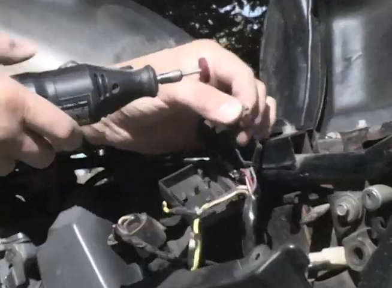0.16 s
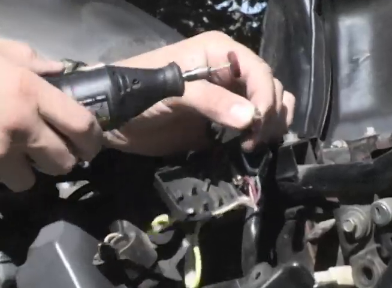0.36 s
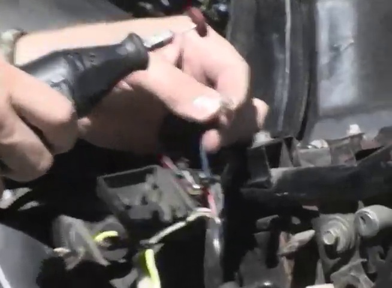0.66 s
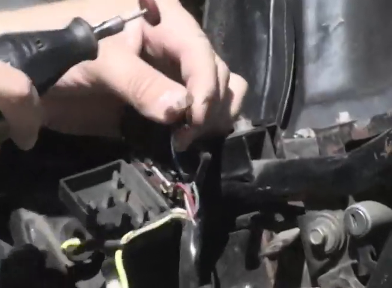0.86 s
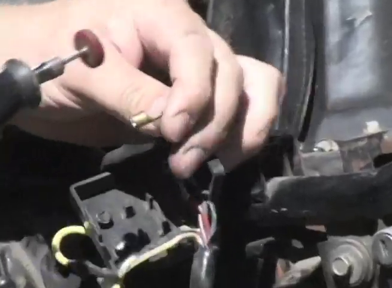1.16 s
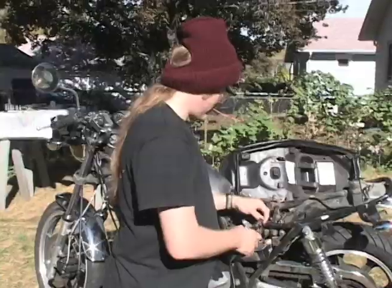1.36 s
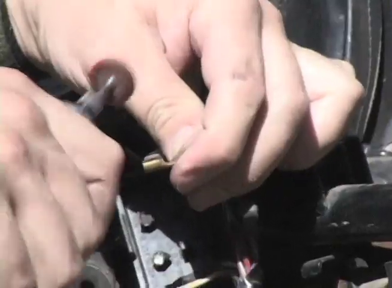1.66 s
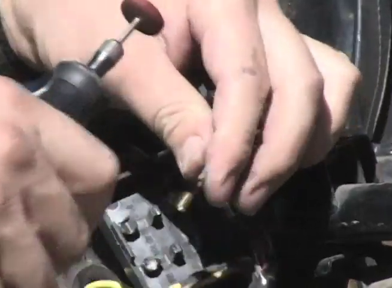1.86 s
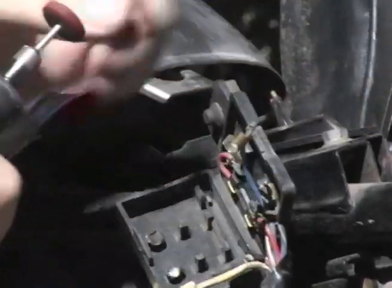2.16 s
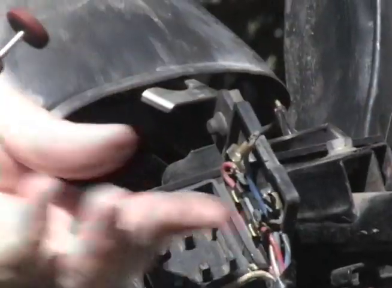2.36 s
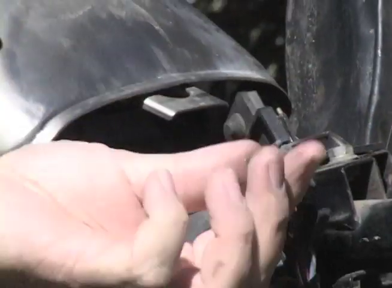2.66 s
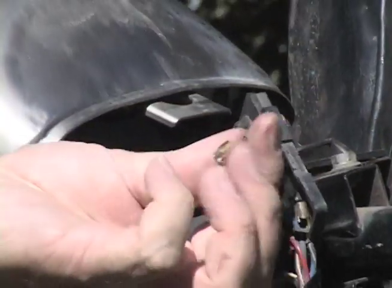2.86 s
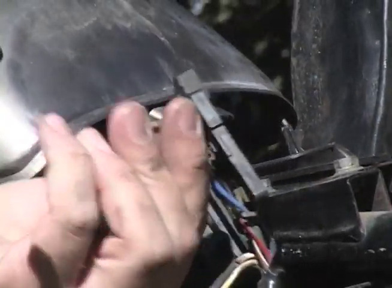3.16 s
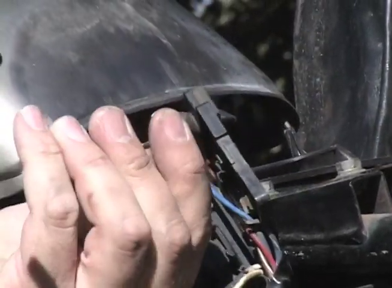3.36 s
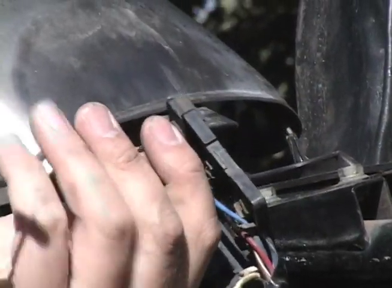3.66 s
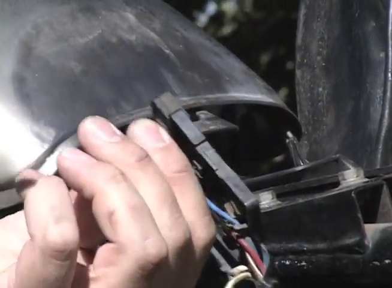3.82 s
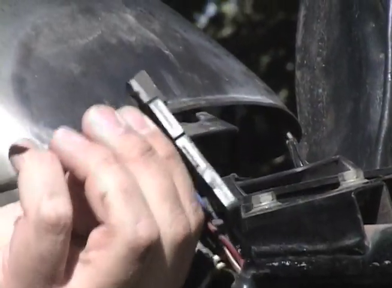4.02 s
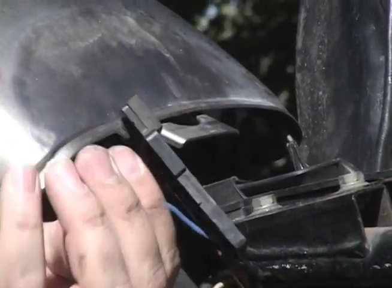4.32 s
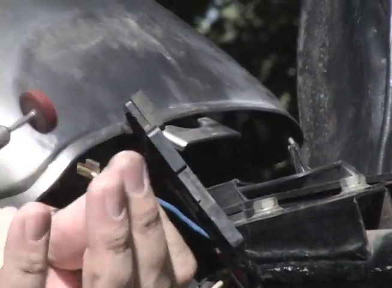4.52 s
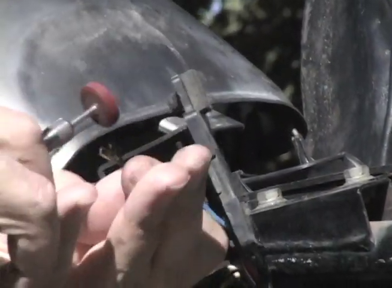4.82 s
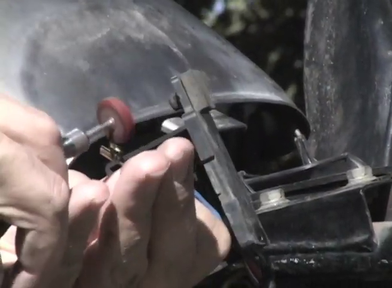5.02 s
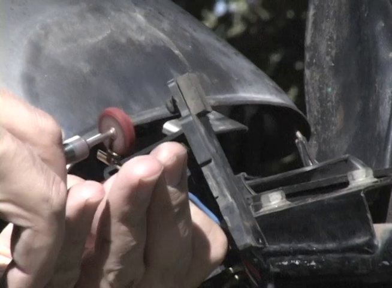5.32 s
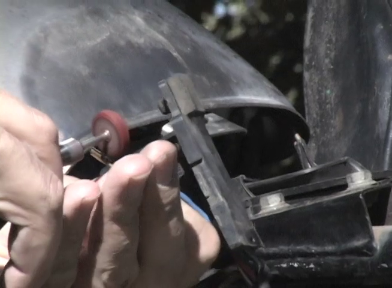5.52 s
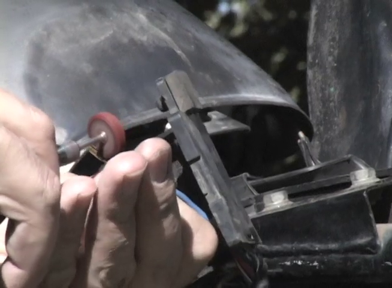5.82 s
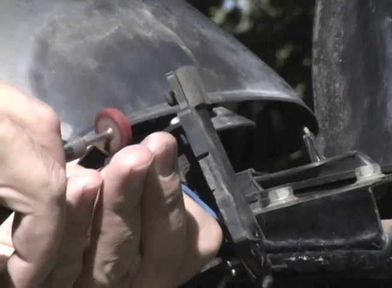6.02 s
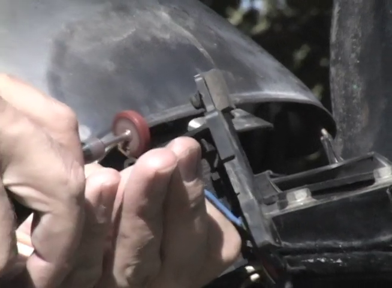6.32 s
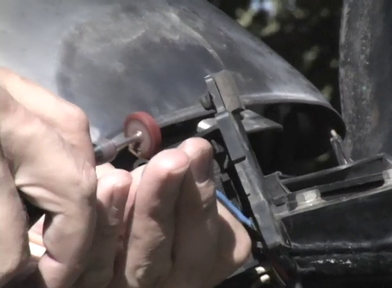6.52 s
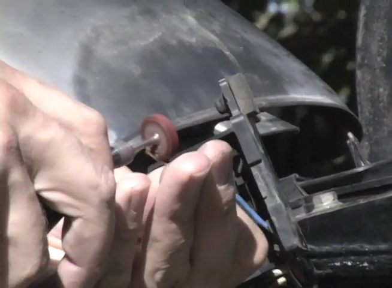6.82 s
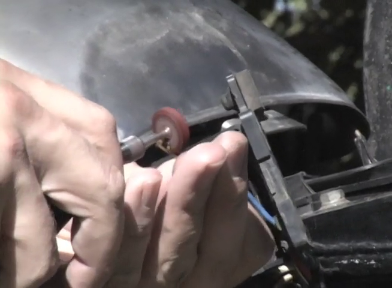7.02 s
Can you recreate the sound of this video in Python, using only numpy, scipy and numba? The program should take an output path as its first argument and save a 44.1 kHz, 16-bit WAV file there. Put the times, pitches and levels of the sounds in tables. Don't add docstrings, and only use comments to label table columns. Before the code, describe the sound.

From 0 to 0.5 s, a quiet yard: soft town hum, fading traffic rumble, a faint chirp, and distant hoarse crow caws near 0.1 and 0.55 s, with tiny plastic ticks. At 0.5 s a sharp slider switch snaps with a quick rattle. A handheld rotary tool starts at once, its growl raspy and buzzing, racing upward; another far caw at 1.05 s is partly masked. By 1.5 s it is a rising whine, climbing ever more slowly until about 4 s, with a light tick at 2.85 s. Piercing mid-high tones, a rough mains-like buzz and airy vent hiss swell, hollow and flicker as the hand turns it. From 4 to 6.3 s it holds fairly steady. Around 6.4 s felt begins scratching brass, strongest near 6.75 s; pitch sags through 7.1 s, still running. Close single microphone, open air.

```python
import sys
import numpy as np
from scipy import signal
from scipy.fft import rfft, irfft
from scipy.io import wavfile
from scipy.ndimage import uniform_filter1d
from numba import njit

SR = 44100
rng = np.random.default_rng(int(sys.argv[2]) if len(sys.argv) > 2 else 0)


def log_audio(samples):
    frames = np.atleast_2d(samples).T
    limited = np.clip(frames, -1, 1)
    pcm = np.round(limited * 32767).astype(np.int16)
    wavfile.write(sys.argv[1], SR, pcm)


def rack_gain(trim_db):
    fader = np.asarray(trim_db, float)
    return 10 ** (fader / 20)


N = 316638
T = np.arange(N) / SR
MAINS_PULSE_HZ = 120
FREE_HZ = 278

# centre_hz, width_hz
CASING = (2350, 260)
CASING_HZ, CASING_WIDTH_HZ = CASING


def curves(table):
    time_s, *columns = np.transpose(table)
    return [np.interp(T, time_s, column) for column in columns]


def steady(x, level_db):
    return x * rack_gain(level_db) / np.sqrt(uniform_filter1d(x ** 2, size=8000) + 1e-20)


def band(x, lo_hz, hi_hz):
    return signal.sosfilt(signal.butter(4, [lo_hz, hi_hz], "band", fs=SR, output="sos"), x)


def coloured(points):
    hz, db = np.transpose(points)
    bins_hz = np.maximum(np.arange(N // 2 + 1) * SR / N, 1)
    gain = rack_gain(np.interp(np.log(bins_hz), np.log(hz), db))
    x = irfft(rfft(rng.standard_normal(N)) * gain, N)
    return x / x.std()


def walk(rate_hz):
    hold = int(SR / rate_hz)
    steps = np.repeat(rng.standard_normal(N // hold + 1), hold)
    return 1.3 * uniform_filter1d(uniform_filter1d(steps, hold), hold)[:N]


@njit
def ring(x, hz, width_hz):
    y, b, l = np.empty(len(x)), 0., 0.
    for i in range(len(x)):
        g, k = np.tan(np.pi * hz[i] / SR), width_hz / hz[i]
        v = (b + g * (x[i] - l)) / (1 + g * (g + k))
        b, l, y[i] = 2 * v - b, l + 2 * g * v, k * v
    return y


def posed(pose_db):
    turning_s = (1.5, 2.8, 3.3, 5.0, 5.35, 6.5, 7.0)
    pose_at = (0, 1, 2, 2, 3, 3, 4)
    return np.interp(T, turning_s, np.take(pose_db, pose_at))


def heard_db(line_hz, turn, ring_hz, spacing_hz):
    level_db, centre_hz, null_hz = curves(turn)
    comb = 1 - .97 * np.cos(np.pi * (line_hz - null_hz) / spacing_hz) ** 2
    return level_db - 20 * np.log10(1 + ((line_hz - centre_hz) / ring_hz) ** 2) + 10 * np.log10(comb)


def shimmer(shaft_hz):
    db_per_hz_s, most_db = .06, 5
    glide_hz_s = np.abs(uniform_filter1d(np.gradient(shaft_hz) * SR, size=9000))
    return np.minimum(db_per_hz_s * glide_hz_s, most_db) * walk(12)


def yard():
    # freq_hz, level_db per Hz
    hum_spectrum = [(25, -26), (48, -25), (85, -9), (130, -9), (270, -4), (500, -5), (750, -6.5),
                    (1000, -7), (1500, -10.5), (2200, -19.5), (3500, -16), (5600, -24), (11000, -28.5),
                    (16000, -29)]
    rumble = steady(band(rng.standard_normal(N), 149, 500), -55.5 + 1.5 * walk(14.2))
    rumble *= np.clip((1.0 - T) / .5, 0, 1)
    return coloured(hum_spectrum) * rack_gain(-51 + 0.3 * walk(2.896)) + rumble


def birds():
    # start_s, length_s, throat_hz, level_db
    caws = [
        (0.124, 0.28, 1363, -50),
        (0.546, 0.24, 1490, -51),
        (1.045, 0.16, 1432, -48.5),
    ]
    # start_s, length_s, throat_hz, level_db
    chirp = (.01, .09, 3600, -59)
    pulse_hz = 60 * (1 + 0.137 * walk(31.0))
    pulses = np.exp(0.81 * np.cos(2 * np.pi * np.cumsum(pulse_hz) / SR))
    out = 0
    for start_s, length_s, hz, level_db in caws + [chirp]:
        u = np.clip((T - start_s) / length_s, 0, 4)
        shape = np.clip(u / .12, 0, 1) * np.where(u < .5, 1, np.exp(-(u - .5) / .3))
        throat_hz = hz * (1 - 0.066 * np.minimum(u, 1.2) ** 2)
        tone = np.sin(2 * np.pi * np.cumsum(throat_hz) / SR)
        breath = (1.5 + 6 * np.minimum(u, 1)) * rng.standard_normal(N)
        voice = pulses * (tone + breath)
        out = out + shape * steady(ring(voice, throat_hz, 0.16 * hz), level_db)
    return out


def ticks():
    # start_s, peak_db, bright (0 dull to 1), t60_s
    contacts = [(.185, -46, 0.93, .02), (.375, -39, 0, .03), (.395, -46, 0.76, .012),
                (.438, -48, 0.95, .01), (.4947, -26.5, 0.7, .009), (0.4981, -29, 0.42, 0.027),
                (.5012, -32, 0.47, 0.017), (.503, -38, 0.28, 0.029), (.5757, -42, 0.99, .008),
                (.27, -51, 0, .03), (2.845, -34, 0, .04), (7.003, -40, 0.082, .05)]
    # freq_hz, width_hz, level_db
    modes = [(1700, 860, -7), (3000, 300, -5.5), (4020, 600, -3), (6080, 630, -2.5), (9750, 1200, -6),
             (13000, 3000, -14)]
    out, t = np.zeros(N + 2000), T[:2000]
    for start_s, peak_db, bright, t60_s in contacts:
        decay = np.exp(-np.log(1000) * t / max(t60_s, .003))
        scrape = rng.standard_normal(len(t)) * decay * (1 - np.exp(-t / 0.00015))
        favoured_hz = 1800 * 4.9 ** bright
        sound = 0
        for hz, width_hz, mode_db in modes:
            tilt_db = -14 * np.log2(hz / favoured_hz) ** 2 / 2
            once = ring(scrape, hz + 0 * t, 1.6 * width_hz)
            sound = sound + rack_gain(mode_db + tilt_db) * ring(once, hz + 0 * t, 1.6 * width_hz)
        out[int(start_s * SR):][:2000] += rack_gain(peak_db) * sound / np.abs(sound).max()
    return out[:N]


def buffing(angle):
    # time_s, extra_db
    presses = [
        (6.43, 2),
        (6.59, 5),
        (6.745, 7.5),
        (6.83, 6.5),
        (6.96, -1),
        (7.1, -1),
    ]
    flare_s = 0.028
    comb = 0
    for k in range(9, 60):
        level_db = 5 * walk(24) - .4 * abs(k - 37)
        comb = comb + rack_gain(level_db) * np.cos(k * angle + rng.uniform(0, 2 * np.pi))
    turn_part = angle / (2 * np.pi) % 1
    grit = band(rng.standard_normal(N) * np.exp(-turn_part / .2), 9300, 11200)
    scuff = comb / comb.std() + .5 * grit / grit.std()
    press_db = sum(db * np.exp(-((T - time_s) / flare_s) ** 2) for time_s, db in presses)
    return steady(scuff, -52 + press_db) * np.clip((T - 6.33) / .08, 0, 1)


def cooling_air(angle, shaft_hz):
    # freq_hz, level_db per Hz
    vent_spectrum = [(300, -7.5), (750, -3), (950, -1), (1350, -1), (1650, -2.5), (2300, -2), (3100, -7),
                     (4400, -1), (5500, -9), (6300, -4.5), (7200, -10), (8700, -23), (10500, -15),
                     (16000, -26)]
    # freq_hz, width_hz, level_db in each of five poses
    whistles = [(910, 57, -15, -21, 6.5, -19, -18), (1008, 38, 1, 9.5, 3.6, 8, 4),
                (1260, 190, 5.5, 6.5, 1.3, 1.5, 0)]
    edges_hz = (350, 1750, 8000, 9400, 16000)
    range_pose_db = [
        (-46, -44.5, -43.5, -47, -47),
        (-45.5, -44.5, -45.5, -44.5, -42.5),
        (-54.5, -57.5, -50.5, -57, -64),
        (-54, -55, -49.5, -52.5, -45.5),
    ]
    # start_s, fading_s, hiss_lift_db
    vent_glimpse = (2.22, 0.74, 6.3)
    db_per_decade = 24.5
    rush = coloured(vent_spectrum) * (1 + 0.059 * np.cos(angle))
    for hz, width_hz, *pose_db in whistles:
        rush += rack_gain(posed(pose_db)) * ring(rush, hz + 0 * T, 1. * width_hz)
    rush -= 0.44 * ring(rush, 1650 + 0 * T, 100.0)
    speed_db = db_per_decade * np.log10(shaft_hz / FREE_HZ)
    levels_db = [posed(pose_db) + speed_db for pose_db in range_pose_db]
    start_s, fading_s, lift_db = vent_glimpse
    fade = np.exp(-(np.maximum(T - start_s, 0) / fading_s) ** 2)
    levels_db[2] += lift_db * np.clip((T - start_s) / .1, 0, 1) * fade
    trims_db = (-2.1, 2, -4.5, -4.0)
    out = 0
    for lo_hz, hi_hz, level_db, trim_db in zip(edges_hz, edges_hz[1:], levels_db, trims_db):
        out = out + steady(band(rush, lo_hz, hi_hz), level_db + trim_db + 0.89 * walk(9))
    return out


def singing(angle, shaft_hz):
    # multiple, level_db
    strong_lines = [(15, 2.8), (16, 2.5), (17, -6), (18, 4.5)]
    # multiple, open_db, aside_db, part_db
    weak_lines = [(1, -63, -60.5, -63), (2, -70, -66, -67), (3, -72, -59, -65), (4, -70, -62, -68),
                  (6, -62, -58, -59), (10, -64, -60, -58), (12, -68, -60, -57), (14, -59, -55, -55),
                  (19, -62, -64, -60), (21, -62, -61, -60), (23, -57, -61, -59), (24, -55, -59, -60),
                  (25, -66, -65, -68), (27, -73, -69, -68), (29, -74, -72, -70), (31, -75, -71, -75),
                  (32, -75, -70, -75), (34, -74, -68, -65), (36, -73, -59, -65), (38, -78, -69, -67),
                  (39, -75, -68, -68), (40, -75, -69, -65), (42, -72, -75, -70), (44, -77, -73, -73),
                  (45, -79, -76, -74), (46, -80, -78, -74), (48, -82, -78, -76)]
    # time_s, level_db, centre_hz, null_hz of the hand's reflection
    cavity_turn = [(1.0, -55, 2900, 2500), (1.37, -43.5, 3500, 3000), (1.6, -52, 4330, 3800),
                   (1.91, -45.7, 4293, 3645), (2.18, -36.7, 4307, 3765), (2.48, -32.1, 4564, 4529),
                   (2.81, -35.5, 4442, 4213), (3.13, -33.7, 4621, 4754), (3.89, -33.8, 4678, 4613),
                   (4.04, -38.1, 4540, 4550), (4.28, -36, 4962, 4879), (4.65, -33.3, 4499, 4598),
                   (5.27, -33.6, 4626, 4647), (5.37, -40, 4551, 4664), (5.74, -33.4, 4732, 5034),
                   (6.58, -32.4, 4754, 4970), (7.12, -33.5, 4539, 4762), (7.18, -38.7, 4187, 4176)]
    cavity_ring_hz, null_spacing_hz = 214, 1300
    ripple_depth = .08 + 2.2 * np.clip(1 - shaft_hz / FREE_HZ, 0, .3)
    ripple = 1 + ripple_depth * np.cos(2 * np.pi * MAINS_PULSE_HZ * T)
    strong = 0
    for k, db in strong_lines:
        level_db = db + heard_db(k * shaft_hz, cavity_turn, cavity_ring_hz, null_spacing_hz)
        level_db = level_db + shimmer(shaft_hz) + 1.5 * walk(25)
        strong = strong + rack_gain(level_db) * np.cos(round(k) * angle + k * k)
    weak, play = 0, .035 * walk(90)
    for k, open_db, aside_db, part_db in weak_lines:
        k = round(k)
        level_db = posed([open_db, open_db, aside_db, part_db, part_db])
        level_db = level_db + 2.5 * walk(3) + 2.2 * walk(20)
        weak = weak + rack_gain(level_db) * np.cos(k * angle + k * k + k * play)
    return np.sqrt(2) * ripple * (strong + weak * np.clip((T - .6) / 0.44, 0, 1))


def strain(angle, shaft_hz):
    # multiple, level_db
    slots = [(8, -20), (16, -6), (24, 0), (32, -1), (40, -10), (48, -18)]
    half_wave = (T * MAINS_PULSE_HZ) % 1
    jolt = np.exp(-half_wave / 0.22) * (1 - np.exp(-half_wave / 0.09)) * rack_gain(1.2 * walk(59.2))
    wobble = 1 + .6 * np.cos(angle)
    pull = sum(rack_gain(db + 3 * walk(22)) * np.cos(k * angle + 1.1 * walk(300)) for k, db in slots)
    pull = pull * (.2 + jolt) * wobble
    load = np.clip(1 - shaft_hz / FREE_HZ, 0, 1)
    rasp = pull * rack_gain(-26.5) * load * (shaft_hz / FREE_HZ) ** 2.2
    thump = 1.1 * np.sin(2 * np.pi * CASING_HZ * half_wave / MAINS_PULSE_HZ)
    knock = .05 * pull + jolt ** 2 * (rng.standard_normal(N) + thump)
    buzz = ring(ring(knock, CASING_HZ + 0 * T, 480.0), CASING_HZ + 0 * T, 440.0)
    crossing = sum(1 / (1 + ((k * shaft_hz - CASING_HZ) / CASING_WIDTH_HZ) ** 4) for k, _ in slots[1:4])
    buzz_db = -52 + 5 * crossing + 14 * np.log10(shaft_hz / 150)
    return rasp + steady(buzz, buzz_db) * np.clip((1.5 - T) / .4, 0, 1)


def slot_whine(angle, shaft_hz):
    # step of 120 Hz, level_db
    sidebands = [(0, 9), (1, 5), (2, -3), (3, -6.5)]
    # step of 120 Hz, level_db at the resonance
    outer = [(-3, -51), (-2, -45.5), (-1, -45), (3, -48), (4, -47), (5, -53), (6, -53), (7, -58)]
    upper_pose_db = (2, -1, 3, -7, -1)
    # time_s, level_db, centre_hz, null_hz of the hand's reflection
    casing_turn = [(1.04, -50, 1900, 2100), (1.36, -46, 2150, 1900), (1.5, -39, 2339, 2244),
                   (2.2, -37.6, 2410, 2580), (2.58, -26.7, 2443, 2475), (2.89, -22.6, 2415, 2424),
                   (3.24, -28.3, 2499, 2580), (3.57, -28.9, 2512, 2463), (4.15, -33, 2375, 2325),
                   (4.56, -26.2, 2510, 2540), (5.01, -29.2, 2460, 2480), (5.21, -29, 2390, 2425),
                   (5.31, -26.5, 2480, 2396), (5.42, -31, 2460, 2390), (5.62, -26.5, 2395, 2345),
                   (6.63, -28.9, 2341, 2287), (6.83, -28.8, 2394, 2330), (7.18, -26.5, 2363, 1917)]
    casing_ring_hz, null_spacing_hz = 75, 550
    mains = 2 * np.pi * MAINS_PULSE_HZ * T
    ring_hz = casing_ring_hz * (1 + 1.5 * np.clip((255 - shaft_hz) / 25, 0, 1))
    levels_db = []
    for m, db in sidebands:
        line_hz = 8 * shaft_hz + m * MAINS_PULSE_HZ
        level_db = db + heard_db(line_hz, casing_turn, ring_hz, null_spacing_hz) + shimmer(shaft_hz)
        levels_db.append(level_db)
    loud_db = 10 * np.log10(sum(rack_gain(2 * db) for db in levels_db))
    lines = 0
    for m, db in enumerate(levels_db):
        lines = lines + rack_gain(db + .8 * walk(30)) * np.cos(8 * angle + m * mains + .6 * m * m)
    for m, db in outer:
        detune = (8 * shaft_hz + m * MAINS_PULSE_HZ - CASING_HZ) / CASING_WIDTH_HZ
        level_db = db + (m > 2) * posed(upper_pose_db) + loud_db / 3 + 12 + 2 * walk(4)
        lines += rack_gain(level_db) / (1 + detune ** 2) * np.cos(8 * angle + m * mains + .6 * m * m)
    rattle = ring(rng.standard_normal(N), CASING_HZ + 0 * T, 700.0)
    return (np.sqrt(2) * lines + steady(rattle, loud_db - 22)) * np.clip((T - .9) / 0.33, 0, 1)


def scene():
    # time_s, shaft_hz
    speed = [(0.52, 15.6), (0.59, 56.7), (0.7, 102.6), (0.87, 148.2), (1.04, 181.2), (1.24, 208.2),
             (1.54, 233.2), (1.89, 253), (2.28, 265.6), (2.76, 274.1), (3.28, 280), (3.86, 283.5),
             (4.55, 285.2), (6.4, 284.6), (6.71, 281.8), (6.83, 277.4), (6.99, 267.8), (7.18, 250.8)]
    shaft_hz = uniform_filter1d(curves(speed)[0], size=3000)
    angle = 2 * np.pi * np.cumsum(shaft_hz * (1 + 0.000377 * walk(40))) / SR
    motor = slot_whine(angle, shaft_hz) + strain(angle, shaft_hz) + singing(angle, shaft_hz)
    tool = motor + cooling_air(angle, shaft_hz) + buffing(angle)
    switched_on = np.clip((T - .5) / 0.053, 0, 1)
    mono = yard() + birds() + ticks() + tool * switched_on
    return np.array([mono, mono])


def band_limit(x):
    return signal.sosfilt(signal.butter(12, 16270, fs=SR, output="sos"), x)


def record(dry):
    top = signal.ellip(8, .2, 60, 15480, fs=SR, output="sos")
    mix = signal.sosfilt(top, dry)
    return band_limit(mix)


dry = scene()
out = record(dry)
log_audio(out)
```